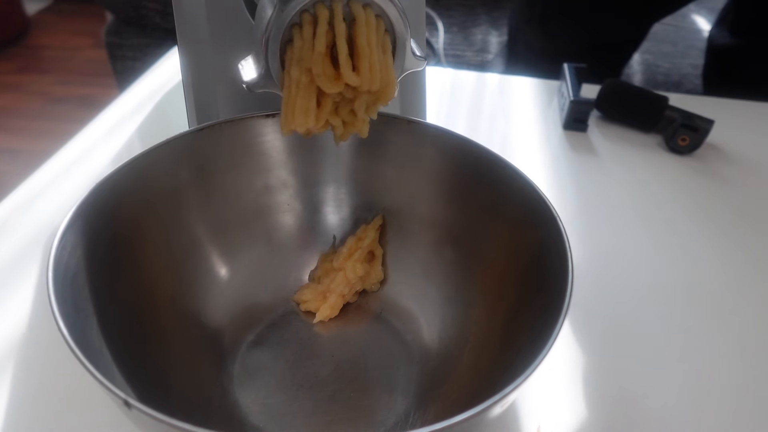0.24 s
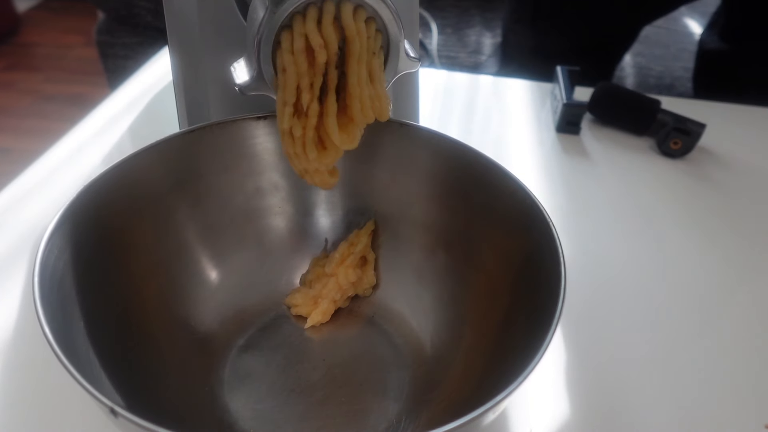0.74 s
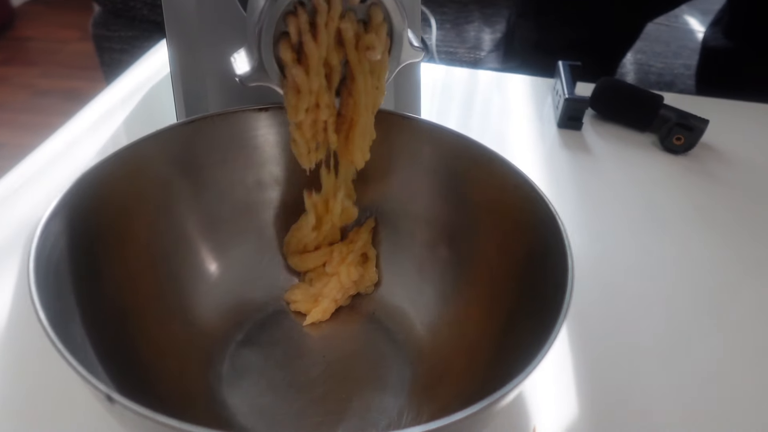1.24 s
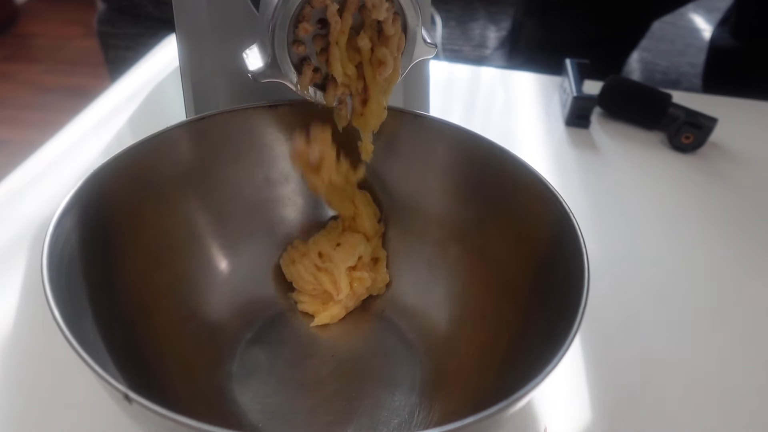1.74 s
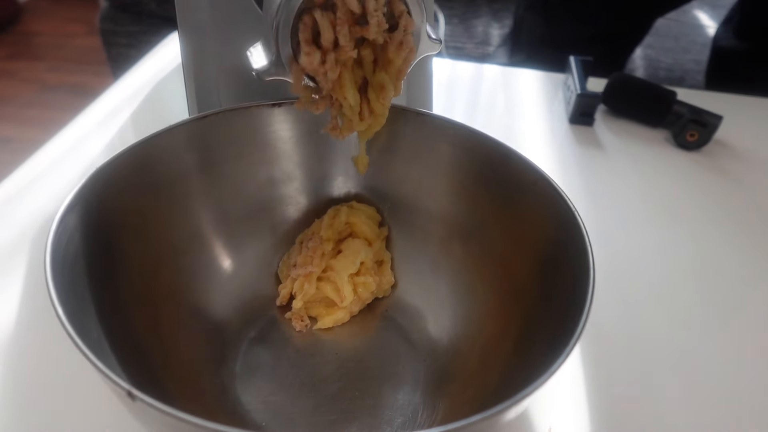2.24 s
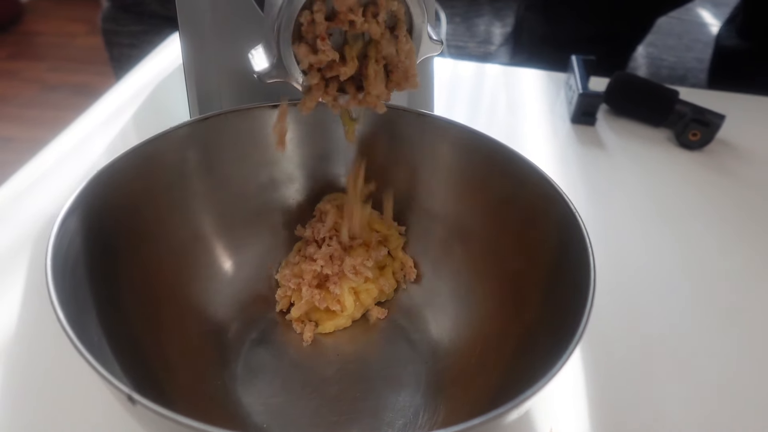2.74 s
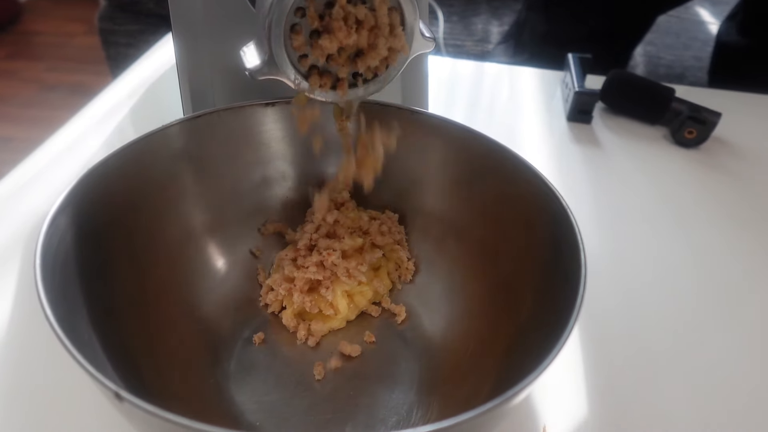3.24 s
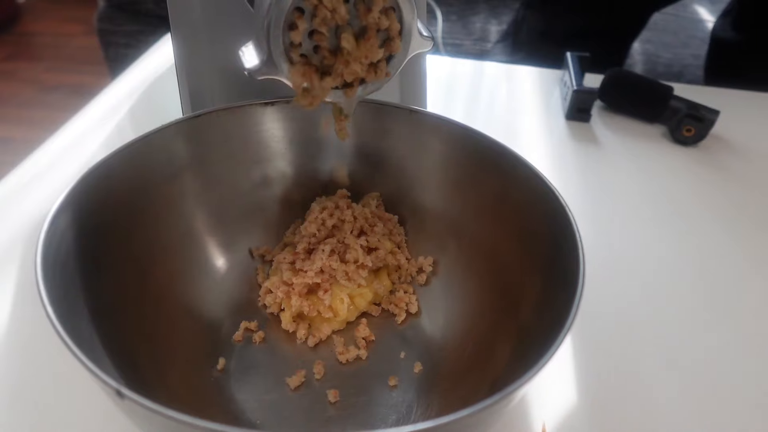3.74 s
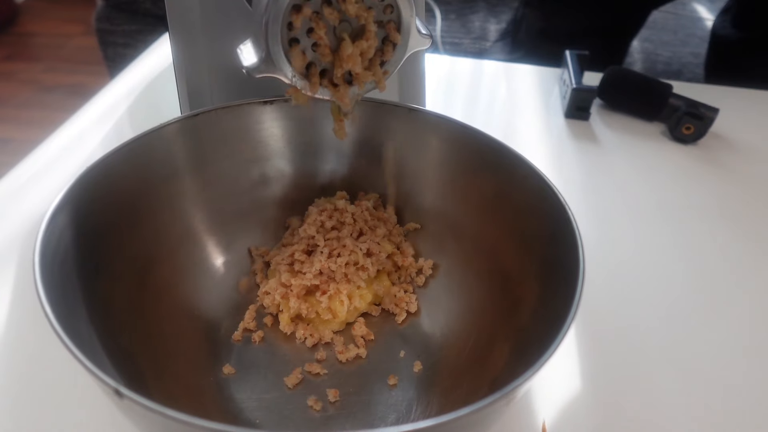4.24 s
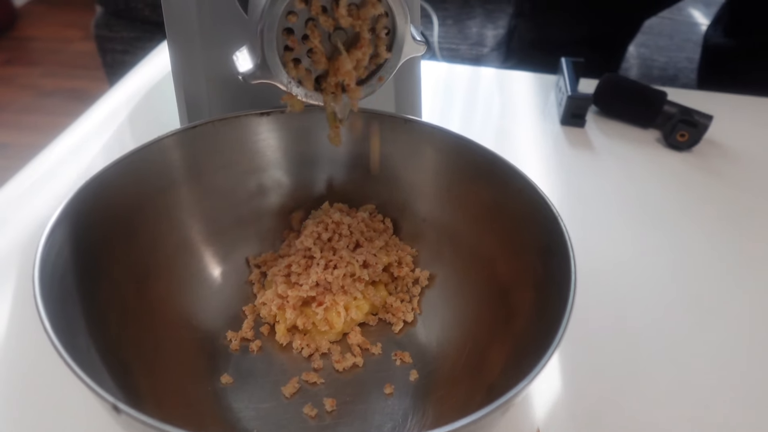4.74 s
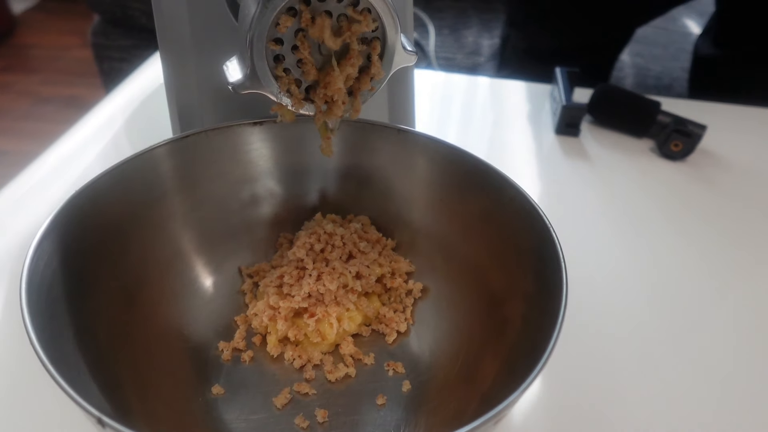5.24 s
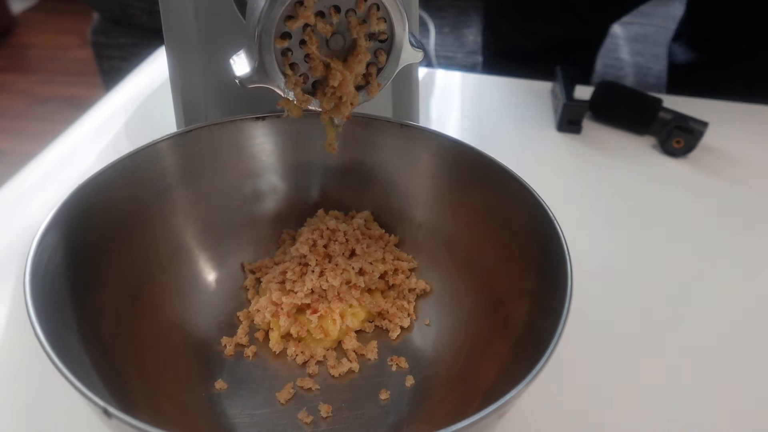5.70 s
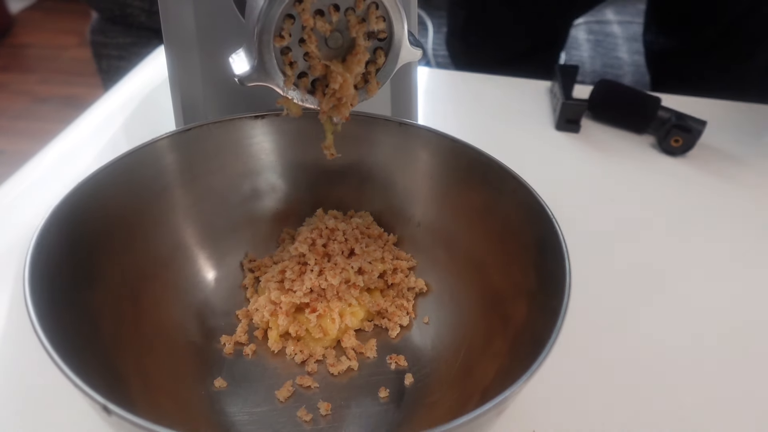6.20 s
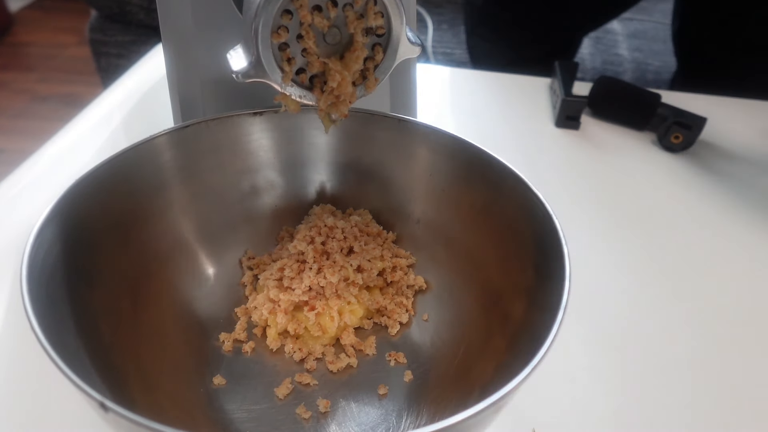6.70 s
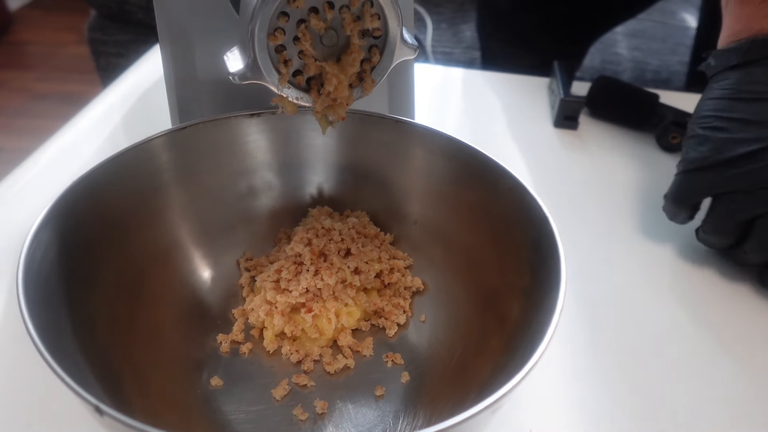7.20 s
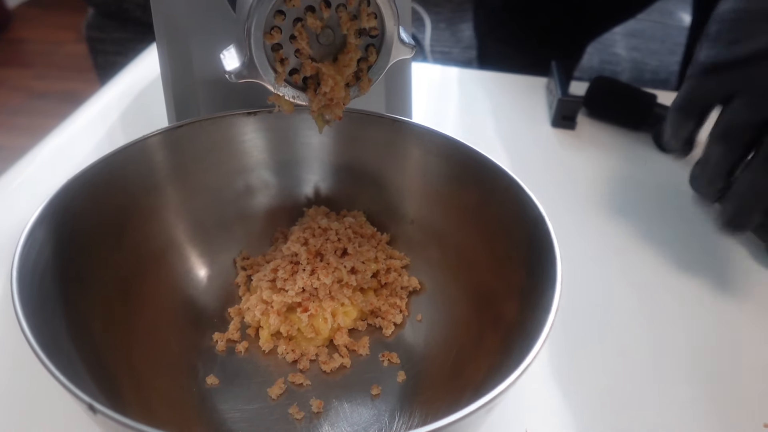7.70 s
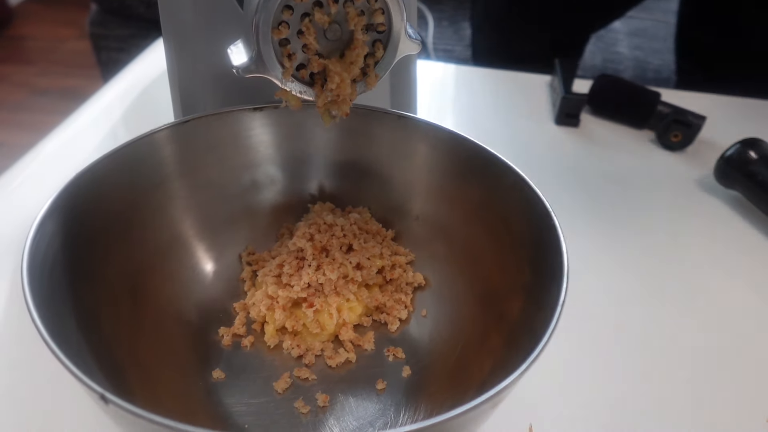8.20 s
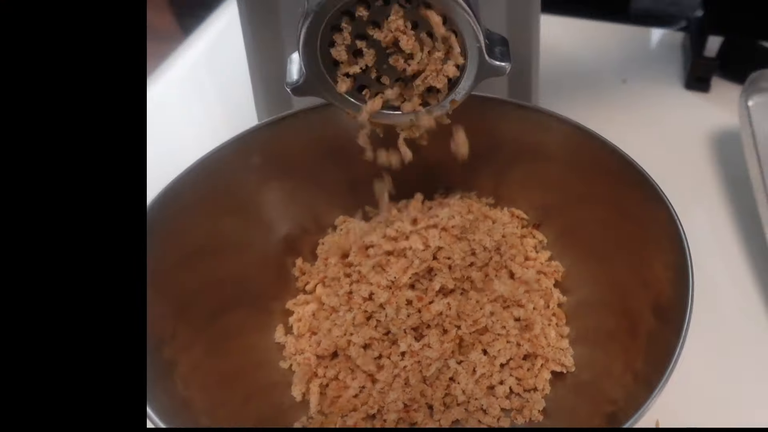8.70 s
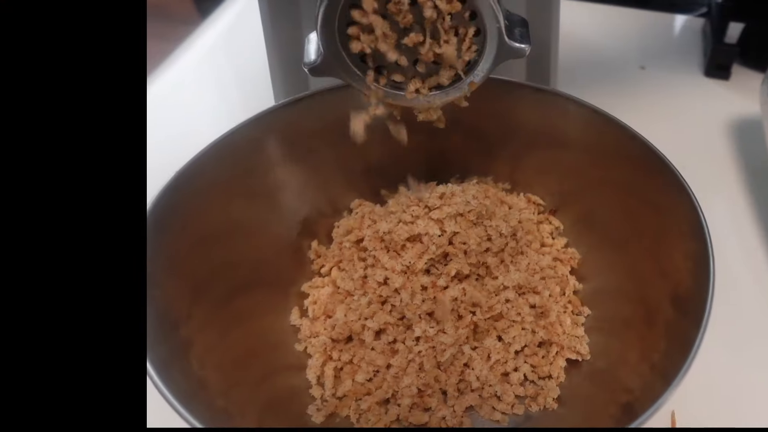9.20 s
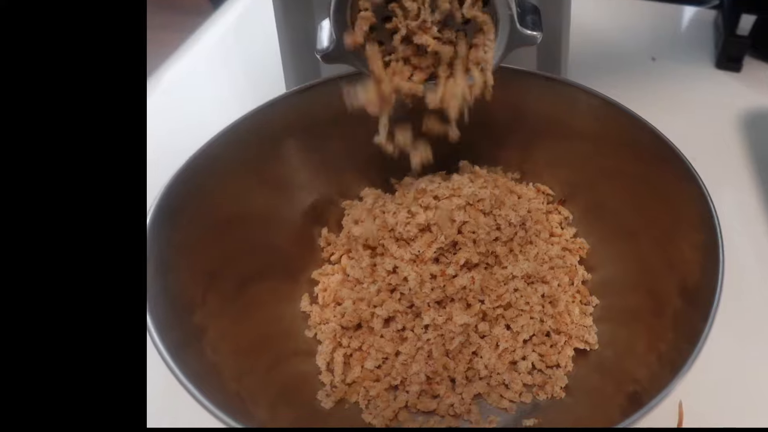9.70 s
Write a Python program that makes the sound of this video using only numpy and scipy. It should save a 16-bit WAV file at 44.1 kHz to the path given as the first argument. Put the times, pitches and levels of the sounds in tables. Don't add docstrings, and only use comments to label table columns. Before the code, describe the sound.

Close grinder whine with chattering gears wavers, coasts down in falling pitch, leaves a quiet pause of plastic handling and knocks, then abruptly runs again.

```python
import sys
import numpy as np
from scipy import signal
from scipy.io import wavfile
from scipy.ndimage import uniform_filter1d

SR = 44100
rng = np.random.default_rng(int(sys.argv[2]) if len(sys.argv) > 2 else 0)


def attenuation_scalar(level_db):
    decades = np.asarray(level_db, float) / 20
    return 10 ** decades


def pcm_store(signal):
    levels = np.round(np.clip(np.atleast_2d(signal), -1, 1) * 32767)
    wavfile.write(sys.argv[1], SR, levels.astype(np.int16).T)


N = 438794
T = np.arange(N) / SR

OFF_S, ON_S = 4.74, 8
POWERED, AGAIN = (T < OFF_S) | (T > ON_S), T > ON_S
MAINS_TURN = 2 * np.pi * 100 * T
PULL = np.cos(MAINS_TURN) * POWERED
USUAL_HZ, COAST_HZ = 235, 253
TEETH, WHEEL_TEETH = 7, 54
SMEAR = .12

# t/s, level/dB
CHATTER = [(0, 3), (.78, 2), (1.16, 5), (1.21, -2), (1.77, 1.6), (3.53, -0.5), (4.04, 5.5), (4.18, 1.5),
           (4.71, 0), (5.23, 4), (5.72, -0.1), (6.06, 5), (6.26, -7), (6.37, -19), (8.72, 1), (9.52, -0.1),
           (9.95, 3)]
ORDERS = [1.945, 3.89, 5.835, 28, 36.7, 5, 8, 8.945, 9.59, 10.89, 12, 14.78, 15, 15.945, 17.89, 19]
# f/Hz, level/dB
FALLING = [(200, -50), (260, -37), (360, -25), (440, -25), (560, -36), (685, -15), (790, -33), (950, -21),
           (1070, -22), (1150, -31), (1240, -21), (1350, -16), (1420, -13), (1490, -17), (1560, -13),
           (1690, -22), (1790, -14), (1890, -13), (2000, -27), (2130, -14), (2230, -30), (2330, -19),
           (2440, -32), (2550, -21), (2680, -29), (2800, -40), (2960, -24), (3100, -36), (3400, -33),
           (4200, -38), (6000, -50)]


def evened(x):
    return x / np.sqrt(np.mean(x ** 2) + 1e-20)


def read(points, hz):
    f, value = np.transpose(points)
    return np.interp(np.log(hz + 1), np.log(f + 1), value)


def curve(points, t):
    return np.interp(t, *np.transpose(points))


def drift(hz):
    return evened(signal.lfilter(*signal.butter(2, hz, fs=SR), rng.standard_normal(N)))


def noise_band(edges, order, count):
    return signal.lfilter(*signal.butter(order, edges, "band", fs=SR), rng.standard_normal(count))


def shaped(x, gain, size=1024):
    hz, t, z = signal.stft(x, SR, nperseg=size, noverlap=size * 3 // 4)
    z = z * gain(hz[:, None], t)
    return signal.istft(z, SR, nperseg=size, noverlap=size * 3 // 4)[1][..., :N]


def share(gain, hz, band):
    return np.sqrt(np.mean(gain ** 2 * (hz > band[0]) * (hz < band[1]), axis=0))


def add(mix, s, sound):
    part = mix[..., round(s * SR):][..., :sound.shape[-1]]
    part += sound[..., :part.shape[-1]]


def grinder():
    shaft_hz = uniform_filter1d(speed(T), size=1500)
    turn = 2 * np.pi * np.cumsum(shaft_hz * (1 + 0.0013 * drift(38.8))) / SR
    notes = unbalance(shaft_hz, turn) + second_stage(shaft_hz, turn) + tooth_mesh(shaft_hz, turn)
    notes += field_splits(shaft_hz, turn)
    notes = shell_ringing(notes, shaft_hz) + whistles(shaft_hz, turn)
    inside = shaped(gear_rattle(turn) + weak_orders(shaft_hz, turn), housing)
    hum = attenuation_scalar(-47 + 0.61 * drift(20)) * PULL
    at_rest = attenuation_scalar(-120 * np.maximum(T - 6.35, 0))
    starting = np.clip((T - 8.716) / 0.025, 0, 1)
    return np.where(T < ON_S, at_rest, starting) * (np.sqrt(2) * (notes + hum) + inside)


def speed(t):
    # t/s, shaft f/Hz
    loaded = [(0, 279.3), (.41, 274.7), (.68, 268.5), (.89, 256), (1.0, 242.3), (1.2, 232.4), (1.36, 222.1),
              (1.78, 235.4), (2.06, 234.2), (2.2, 223.5), (2.42, 200.9), (2.62, 191.7), (2.82, 194.5),
              (3.35, 214.6), (3.54, 217.1), (3.8, 235.7), (4.3, 252), (4.72, 261)]
    # t/s, shaft f/Hz
    second_run = [(8.73, 200.7), (8.77, 201), (8.85, 203), (8.96, 212), (9.2, 212.2), (9.33, 206.2),
                  (9.43, 203.3), (9.5, 205.5), (9.62, 193.2), (9.69, 184.1), (9.73, 181.4), (9.8, 176.8),
                  (9.95, 170)]
    # t/s, f off the smooth run-down/Hz
    unevenness = [(4.74, 5), (4.79, -1), (4.88, 0), (5.08, -2.8), (5.25, .3), (5.45, 1.2), (5.6, -.4), (5.75, -1),
                  (6.2, -1)]
    left = np.clip(1 - (t - OFF_S) / 1.97, .05, 1)
    coasting = COAST_HZ * left ** 1.55 + curve(unevenness, t)
    return np.where((t > OFF_S) & (t < ON_S), coasting, curve(loaded + second_run, t))


def change_db(k, shaft_hz):
    # coasting level/dB, its fall/dB per octave of slowing, second run level/dB
    changes = [(-0.5, 5.5, 6.5), (-0.5, 1, 0.5), (3, 0.5, 0), (-0.5, 1, 2), (-8, -2, 2), (-6.5, 2, 0),
               (-12.5, 0, 0)]
    loose, fall, later = changes[k]
    return np.where(POWERED, later * AGAIN, loose + fall * np.log2(shaft_hz / USUAL_HZ))


def unbalance(shaft_hz, turn):
    # f/Hz, level/dB
    outlet = [(60, -76.5), (150, -56), (175, -34.5), (195, -34), (222, -27), (234, -23), (250, -32.5),
              (272, -23.5)]
    db = read(outlet, shaft_hz) + change_db(0, shaft_hz) + .5 * drift(30) + 1.4 * drift(5.8)
    swallowed = .85 * ~POWERED * np.exp(-((shaft_hz - 221) / 9) ** 2)
    return attenuation_scalar(db) * np.cos(turn) * (1 - swallowed)


def second_stage(shaft_hz, turn):
    stage_db = [-13.5, -18.5]
    # f/Hz, level/dB
    outlet = [(150, -59.5), (320, -28), (450, -25.5), (680, -9), (900, -17), (1450, -17.5), (2300, -18),
              (3100, -33)]
    grid_hz = np.arange(0, 6000., 5)
    modes = np.sqrt(body(grid_hz, -28) / body(grid_hz, -10)) ** 1.9
    out = np.zeros(N)
    for k, db in zip(ORDERS, stage_db):
        flare = np.interp(k * shaft_hz, grid_hz, modes ** 1.5) * ~POWERED
        level = attenuation_scalar(12.5 + db + read(outlet, k * shaft_hz) + 3.8 * drift(23))
        out += level * flare * np.cos(k * turn + SMEAR * 2 * drift(25))
    return out


def tooth_mesh(shaft_hz, turn):
    runout = [(.07, .12, .04, .11), (.1, .1, .06, .06), (.2, .2, .1, .1), (.2, .2, .1, .1),
              (.2, .2, .1, .1), (.2, .2, .1, .1)]
    # f/Hz, level/dB
    mesh = [
        [(1300, -13), (1400, -10.5), (1630, -11), (1675, -16), (1715, -21), (1750, -11.5), (1875, -15),
         (1900, -29)],
        [(2550, -19), (2720, -18.5), (2800, -25), (2920, -21), (3100, -32), (3520, -32), (3620, -22),
         (3750, -17)],
        [(3600, -42.5), (3800, -28), (4060, -32), (4250, -34), (4400, -40.5), (4940, -40.5), (5100, -46),
         (5850, -37.5)],
    ]
    # f/Hz, level/dB
    later_mesh = [
        [(1200, -13), (1250, -16.5), (1300, -17), (1360, -14.5), (1440, -14), (1465, -14.5), (1483, -20)],
        [(2400, -21), (2500, -17), (2600, -14), (2720, -14.5), (2800, -20), (2870, -18), (2970, -20)],
        [(3600, -40), (3720, -30), (3800, -28), (3900, -31), (4060, -43), (4230, -36), (4330, -35), (4420, -46)],
    ]
    wheel = turn * TEETH / WHEEL_TEETH
    pull = np.where(AGAIN, .26, .12) * attenuation_scalar(3 * drift(7))
    field_wobble = 0.14 * np.sin(MAINS_TURN) * AGAIN
    slowed = 1 - np.log2(shaft_hz / COAST_HZ)
    out = np.zeros(N)
    for k, depths in enumerate(runout, 1):
        hz = k * TEETH * shaft_hz
        driven_db = -99
        if k <= len(mesh):
            driven_db = np.where(AGAIN, read(later_mesh[k - 1], hz), read(mesh[k - 1], hz))
        loose_db = read(FALLING, hz) + 0.7 * np.minimum(curve(CHATTER, T), 0)
        db = change_db(k, shaft_hz) + np.where(POWERED, driven_db, loose_db)
        throb = sum(depth * (1 + .5 * drift(3.4)) * np.cos(n * wheel + n * k)
                    for n, depth in enumerate(depths, 1))
        throb *= np.where(POWERED, np.where(AGAIN, 2.1, 1), 1.2)
        level = attenuation_scalar(db + np.where(POWERED, 1.5, .7 * np.sqrt(k)) * drift(23))
        smear = SMEAR * np.sqrt(k) * slowed * drift(25) * ~POWERED
        phase = k * TEETH * turn + k - field_wobble + 0.77 * throb + smear
        out += level * (1 + throb + pull * PULL) * np.cos(phase)
    return out


def field_splits(shaft_hz, turn):
    splits = [(12, 1, -37, -28), (12, -1, -40, -35), (12, 0, -45, -30), (7, 1, -33, -33),
              (8.945, 0, -45, -28), (8.945, 1, -45, -30)]
    flutter = drift(7.8)
    out = np.zeros(N)
    for k, beats, db, later_db in splits:
        phase = k * turn + beats * MAINS_TURN + .5 * drift(30)
        wander_db = 3 * np.roll(flutter, round(3000 * (k + beats)))
        out += POWERED * attenuation_scalar(np.where(AGAIN, later_db, db) + wander_db) * np.cos(phase)
    order = 8.945
    slowing_db = 4 * np.log2(shaft_hz / USUAL_HZ)
    sum_db = -7 + read(FALLING, order * shaft_hz) + 2 * slowing_db + 2.4 * flutter
    return out + ~POWERED * attenuation_scalar(sum_db) * np.cos(order * turn + .5 * flutter)


def shell_ringing(notes, shaft_hz):
    t = T[:SR // 4]
    tail = rng.standard_normal(len(t)) * attenuation_scalar(-60 * t / .24)
    ringing = .85 * ~POWERED * np.clip(2 - shaft_hz / 115, 0, 1)
    rung = signal.oaconvolve(ringing * notes, tail / np.linalg.norm(tail))[:N]
    return np.sqrt(1 - ringing ** 2) * notes + rung


def whistles(shaft_hz, turn):
    thin_walls = [(3.89, 680, 55, -22), (28, 5400, 150, -45), (28, 5750, 100, -49), (28, 6560, 150, -47),
                  (48, 9800, 600, -47), (60, 13200, 250, -52)]
    out = np.zeros(N)
    for k, f, w, db in thin_walls:
        nearness = np.exp(-((k * shaft_hz - f) / w) ** 2)
        level = POWERED * attenuation_scalar(db + .6 * np.sqrt(k) * drift(6)) * nearness
        out += level * np.cos(k * turn + .03 * k ** .9 * drift(30))
    return out


def gear_rattle(turn):
    wheel = turn * TEETH / WHEEL_TEETH
    beat_db = 0.71 * np.cos(wheel) + 2.0 * np.cos(turn) + 1.86 * drift(9.5) + 1.0 * drift(130)
    hiss = evened(attenuation_scalar(beat_db) * rng.standard_normal(N))
    chips = attenuation_scalar(3.3 * np.minimum(rng.exponential(1, N), 5))
    chips *= (rng.random(N) < 250 / SR) * rng.choice([-1, 1], N)
    flaws = rng.standard_normal(256)
    ladder = np.interp(wheel / (2 * np.pi) * len(flaws), np.arange(len(flaws)), flaws, period=len(flaws))
    return hiss + 0.22 * ladder + 1.8 * chips


def weak_orders(shaft_hz, turn):
    orders_db = [-17, -18.5, -20.5, -20.5, -14, -22.5, -24, -26, -31.5, -23.5, -17.5, -20, -25.5, -23,
                 -32.5, -26]
    coasting_orders = 5
    out = np.zeros(N)
    for i, (k, db) in enumerate(zip(ORDERS, orders_db)):
        level = attenuation_scalar(db + 2.2 * drift(3.2) + 4.3 * drift(16)) * min(1, 14 / k)
        if k == 12:
            level *= attenuation_scalar(-np.clip((k * shaft_hz - 2950) / 15, 0, 7))
        if i >= coasting_orders:
            level = level * POWERED
        out += level * np.cos(k * turn + 0.1 * k ** 0.62 * drift(14.0))
    driven_db = 0.05 * (225 - shaft_hz) - 2.7 * AGAIN
    loose_db = 0.38 * 4 * np.log2(shaft_hz / USUAL_HZ) - 3.5
    return out * (1 + 0.32 * PULL) * attenuation_scalar(np.where(POWERED, driven_db, loose_db))


def body(hz, shell_db):
    # f/Hz, width/Hz, level/dB
    resonances = [(420, 29, -4), (681, 59, -7), (1053.3, 20, 12), (1216, 30, -6), (1314, 22.5, -19),
                  (1400, 54, 3.5), (1580, 63, 2), (1805, 180, 0), (2112, 37, 0.5), (2890, 32, -7),
                  (3804, 290, -11), (5200, 200, -28.5), (320, 38, -8), (5770, 110, -26.5)]
    # f/Hz, level/dB per Hz
    shell = [(18, -75), (30, -58.5), (144, -23), (214, -3.5), (351, -1), (400, -4), (608, 10), (925, 2.5),
             (1440, 10), (2080, 8), (2310, 14), (2500, 2), (3000, 8), (14400, -38), (15600, -37)]
    power = attenuation_scalar(2 * (read(shell, hz) + shell_db))
    power = power + sum(attenuation_scalar(2 * db) / (1 + (2 * (hz - f) / w) ** 2) ** 2 for f, w, db in resonances)
    return np.sqrt(power)


def housing(hz, t):
    # driven level/dB, rise/dB per octave of speed,
    # coasting level/dB, rise/dB per octave, share of chatter, second run change/dB
    band_levels = [(-28, 5.5, -31.5, -3, 0.81, 6), (-21.5, 11.5, -15.5, 4, 0.82, 0.5),
                   (-28.5, 12, -26.5, 7.5, 0.45, -1.45), (-39, 8.5, -38.5, 5, 0.17, 1.5)]
    # lowest f/Hz, highest f/Hz
    bands = [(300, 1000), (1300, 3000), (4200, 7000), (9000, 15000)]
    # f/Hz, width/Hz, level/dB
    dips = [(857, 25, 1.5), (2598, 40, 1.5), (2155, 88, -6), (3530, 440, -1)]
    loose, again = (t > OFF_S) & (t < ON_S), t > ON_S
    shape = body(hz, np.where(loose, -17, -11))
    shape *= attenuation_scalar(sum(db * np.exp(-((hz - f) / w) ** 2) for f, w, db in dips))
    shape *= attenuation_scalar(-6 * again / (1 + (hz / 480) ** 6))
    shape *= attenuation_scalar(3.8 * again * np.exp(-((hz - 1950) / 110) ** 2))
    octaves = np.log2(speed(t) / USUAL_HZ)
    place = np.interp(np.log(hz + 1), np.log([np.sqrt(a * b) for a, b in bands]), range(4))
    tilt_db = 0
    for k, (driven, rise, coasting, loose_rise, part, later) in enumerate(band_levels):
        db = np.where(loose, coasting + loose_rise * octaves, driven + rise * octaves + later * again)
        db = db + part * curve(CHATTER, t) - 20 * np.log10(share(shape, hz, bands[k]))
        tilt_db = tilt_db + np.maximum(1 - abs(place - k), 0) * db
    return shape * attenuation_scalar(tilt_db)


def knocks():
    # t/s, peak level/dB, counter thump level/dB
    hits = [
        (7.155, -50, -29.5),
        (7.295, -12.5, -6),
        (7.309, -34, -2.5),
        (7.46, -13.5, -1),
        (7.468, -14, -30),
        (7.501, -46, -42),
    ]
    # f/Hz, level/dB, time to fall 60 dB/s
    counter_modes = [(233.6, 0.5, 0.17), (315, 0.5, 0.13), (386, -5, 0.11), (550, -5.5, 0.039)]
    # f/Hz, level/dB, time to fall 60 dB/s
    pusher_modes = [(960, 2, 0.035), (1350, 4, 0.029), (1800, 5.5, 0.021), (2190, -18, .02),
                    (2470, 3.5, 0.04), (2470, -18, 0.43), (3380, -18, 0.018), (3850, -5, 0.029)]
    out, t = np.zeros(N), np.arange(SR // 3) / SR
    for s, db, thump_db in hits:
        crack = noise_band([300, 3600], 4, len(t)) * attenuation_scalar(-60 * t / 0.015)
        rumble = noise_band([200, 1800], 2, len(t)) * attenuation_scalar(-60 * t / 0.42)
        thump = (ring(counter_modes, t) + 0.24 * rumble) * (1 - np.exp(-t / .0015))
        add(out, s, attenuation_scalar(db) * (ring(pusher_modes, t) + 0.5 * crack) + attenuation_scalar(thump_db - 8.5) * thump)
    return signal.lfilter(*signal.butter(2, 130, "high", fs=SR), out)


def ring(modes, t):
    x = sum(attenuation_scalar(db - 60 * t / max(t60, .005)) * np.sin(2 * np.pi * hz * t * rng.uniform(0.94, 1.03))
            for hz, db, t60 in modes)
    return x / abs(x).max()


def slides():
    # f/Hz, level/dB per Hz
    glove = [(880, -29), (1500, -15.5), (1790, -25), (1970, -16), (2950, -6.5), (3960, -9), (5800, -7),
             (9950, -14), (15600, -19)]
    # f/Hz, level/dB per Hz
    tube = [(710, -63), (1200, -12), (1370, -40), (1520, -11), (2030, -7), (2210, -21), (2390, -2),
            (2710, -20), (3220, -20), (3710, -8), (4040, -12), (10300, -16), (15600, -16.5)]

    def colour(hz, t):
        fizz_db = strokes(t)[1]
        in_tube = 1.1 * read(tube, hz) + 0.73 * read(glove, hz)
        hiss = attenuation_scalar(np.where(t < 7, in_tube, read(glove, hz)))
        lift_db = fizz_db - 20 * np.log10(share(hiss, hz, (9000, 15000)) / share(hiss, hz, (2000, 15000)))
        hiss *= attenuation_scalar(lift_db * np.clip((hz - 6000) / 5000, 0, 1))
        return hiss / share(hiss, hz, (2000, 15000))

    rough = evened(attenuation_scalar(1.4 * drift(300)) * rng.standard_normal(N))
    level = np.interp(T, T[::64], strokes(T[::64])[0]) * (T < 8.73)
    return level * shaped(rough, colour, size=256)


def strokes(t):
    # t/s, length/s, hiss level/dB, top fizz over the hiss/dB
    hand_strokes = [(6.453, .075, -40.5, -11.5), (6.538, .055, -38, -8.5), (6.673, 0.0304, -47, -10.5),
                    (6.693, .045, -33.5, -5), (6.734, .035, -44, -2.5), (7.137, .025, -51, -10),
                    (7.221, .15, -51.5, -4.5), (7.402, .04, -43, -11), (7.471, .075, -50, -14),
                    (7.565, .02, -45.5, -5.5), (7.59, 0.067, -49, -1), (8.217, .03, -58, -5),
                    (8.244, 0.57, -50.5, -7), (8.249, .05, -53.5, -21), (8.302, .02, -44, -14),
                    (8.363, .08, -52, 2), (8.447, .045, -43.5, -1.5), (8.545, .11, -43, -8),
                    (8.671, .035, -43, -11.5)]
    start, length, db, fizz_db = np.transpose(hand_strokes)[..., None]
    late = np.maximum(t - start - length, 0)
    fall = attenuation_scalar(-2 * 400 * late) + attenuation_scalar(2 * (-15.5 - 65 * late))
    power = np.clip((t - start) / 0.018, 0, 1) ** 4 * attenuation_scalar(2 * db) * fall + 1e-20
    return np.sqrt(power.sum(0)), (power * fizz_db).sum(0) / power.sum(0)


def clicks():
    # t/s, peak level/dB, centre f/Hz, left over right/dB
    snaps = [(0.9943, -21, 6940, 4.5), (1.287, -28, 8000, 0), (2.876, -19.5, 7075, 0),
             (3.9086, -27, 7490, 0.5), (5.0837, -13, 6960, -3.5), (5.333, -20.5, 7510, -3.5),
             (5.358, -17.5, 7490, -3), (5.803, -25, 8030, -6), (6.0942, -27, 8387, -1.5),
             (6.1652, -31.5, 8040, 0), (6.293, -35, 7420, -4), (1.097, -14.5, 10900, -3.5),
             (1.373, -31, 12300, 0.5), (2.05, -28.5, 12000, 1.5), (2.93, -24, 12000, 2.5),
             (3.441, -28.5, 13060, 1.5), (6.427, -36, 9000, -5), (6.468, -26, 9040, -8.5),
             (6.549, -35, 5940, -12), (6.66, -48.5, 6000, 0), (6.775, -33, 10900, -10),
             (6.968, -41, 6450, -5), (7.062, -42, 6000, -1), (7.1412, -40, 4300, -9), (7.18, -42, 6540, -7),
             (7.317, -42, 7460, -7.5), (7.905, -39, 3000, -9), (7.918, -38, 6490, -7),
             (8.222, -42, 6010, -8), (8.2473, -28, 5980, -7.5), (8.248, -33, 1320, -4),
             (8.2498, -20.5, 5300, -6), (8.5114, -17, 5400, -3), (8.514, -20, 5940, 1.5),
             (8.516, -17, 11200, -1.5), (8.5613, -31, 3980, -1), (8.563, -26.5, 3700, -1),
             (8.81, -26, 7880, 2), (8.831, -26, 8010, -6), (8.919, -30.5, 12420, -1.5),
             (8.99, -12, 10710, -1.5)]
    out, t = np.zeros((2, N)), np.arange(2000) / SR
    for s, db, hz, pan_db in snaps:
        edges = np.clip([hz * 0.63, hz * 1.4], 200, 20000)
        fade_s = min(89 / hz, 0.025)
        snap = noise_band(edges, 2, len(t)) * attenuation_scalar(-60 * t / fade_s)
        add(out, s, attenuation_scalar(db + np.array([[.5], [-.5]]) * pan_db) * snap / abs(snap).max())
    return out


def kitchen(x):
    # f/Hz, time to fall 60 dB/s
    decay = [(200, 0.91), (1000, 0.15), (4000, 0.33), (12000, 0.13)]
    taps = np.zeros((2, SR // 2))
    at = np.arange(200, SR // 2 - 20, 20) + rng.integers(0, 20, (2, (SR // 2 - 201) // 20))
    np.put_along_axis(taps, at, rng.choice([-1., 1.], at.shape), 1)
    tail = shaped(taps, lambda hz, t: attenuation_scalar(-60 * t / read(decay, hz)), size=256)
    x = signal.lfilter(*signal.butter(1, 900, "high", fs=SR), x)
    return signal.fftconvolve(x[None], tail / np.linalg.norm(tail[0]), axes=1)[:, :N]


def air():
    # f/Hz, level/dB per Hz
    room_tone = [(18, -70), (30, -39), (183, 0.5), (285, 0), (342, -3), (641, -7), (1110, -9.5), (1730, -7),
                 (1920, -7.5), (5780, -12), (15600, -17)]
    a, b = rng.standard_normal((2, N))
    pair = np.array([a + 0.47 * b, a - 0.45 * b])
    return attenuation_scalar(-56.5) * evened(shaped(pair, lambda hz, t: attenuation_scalar(read(room_tone, hz))))


def scene():
    # f/Hz, left over right/dB
    lean = [(150, 0.1), (300, -0.8), (1500, -1.3), (5000, -0.6), (10000, -0.3)]
    machine, hand, blows, snaps = grinder(), slides(), knocks(), clicks()
    sides = np.array([.5, -.5])[:, None, None]
    front = shaped(np.array([machine, machine]), lambda hz, t: attenuation_scalar(sides * read(lean, hz)))
    near = front + hand * attenuation_scalar(np.array([[-2.2], [2.3]])) + blows * attenuation_scalar(np.array([[-.8], [.7]])) + snaps
    to_room = attenuation_scalar(-17.0) * machine + attenuation_scalar(-13.5) * hand + attenuation_scalar(-14.5) * blows + attenuation_scalar(-24.0) * snaps.mean(0)
    return near + kitchen(to_room) + air()


def top_cut(x):
    return signal.sosfilt(signal.butter(12, 15770, fs=SR, output="sos"), x)


def record(dry):
    limited = 0.85 * np.tanh(dry / 0.87)
    thin = signal.sosfilt(signal.butter(2, 110, "high", fs=SR, output="sos"), limited)
    edge = signal.firwin(801, 15740, window=("kaiser", 9), fs=SR)
    return top_cut(signal.oaconvolve(thin, edge[None], "same"))


dry = scene()
out = record(dry)
pcm_store(out)
```